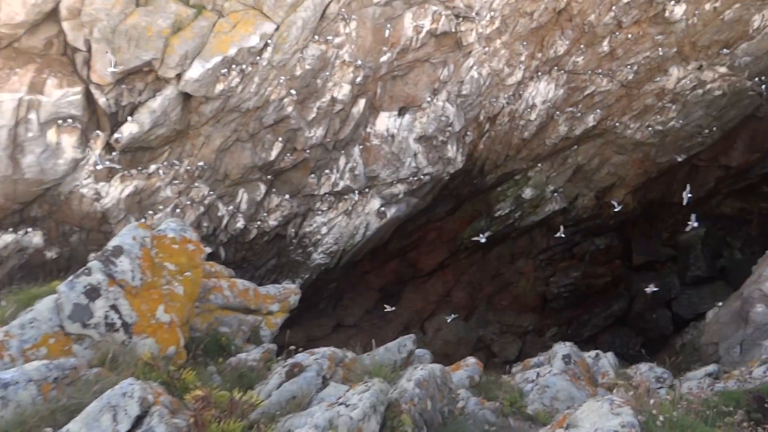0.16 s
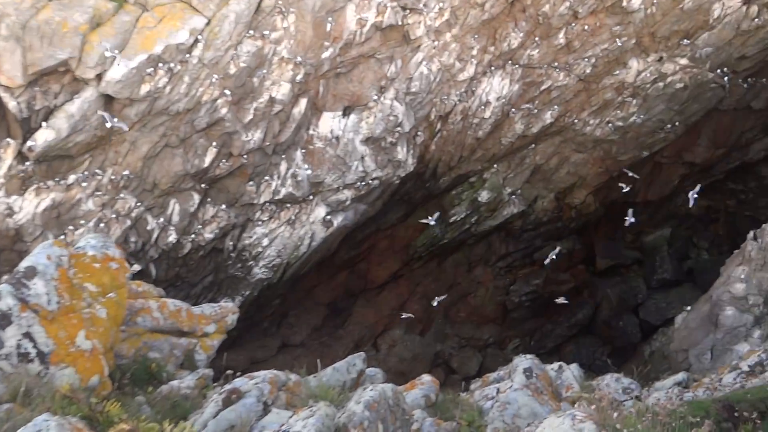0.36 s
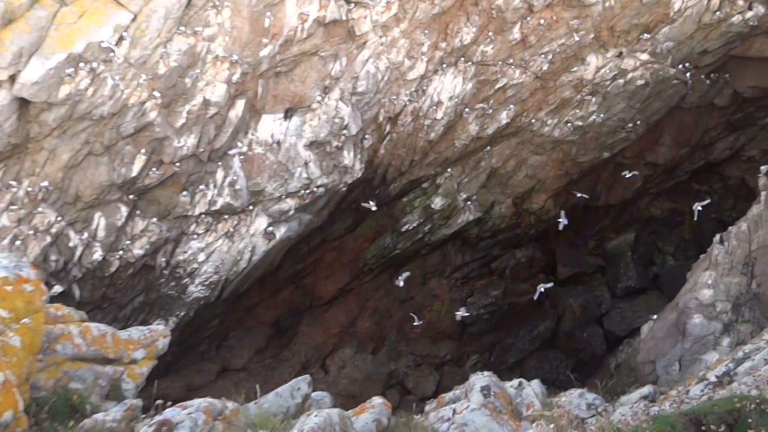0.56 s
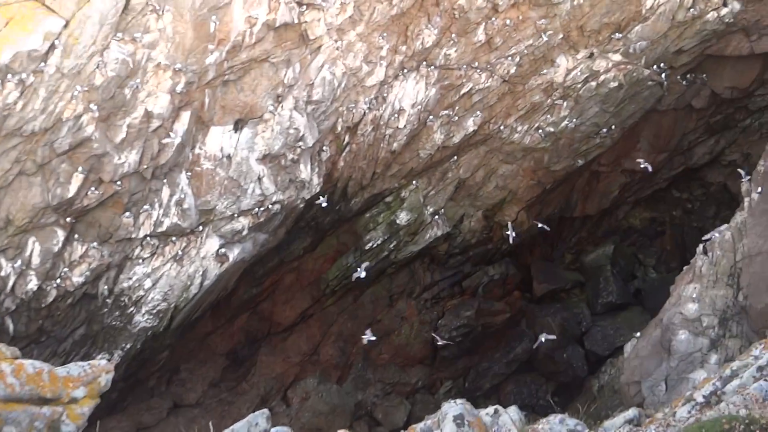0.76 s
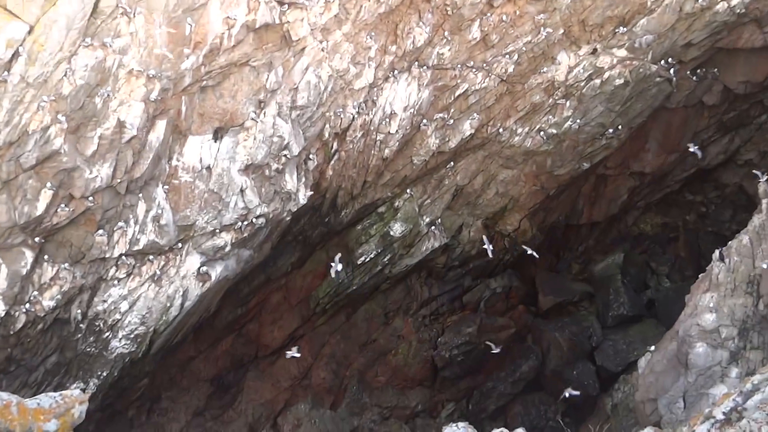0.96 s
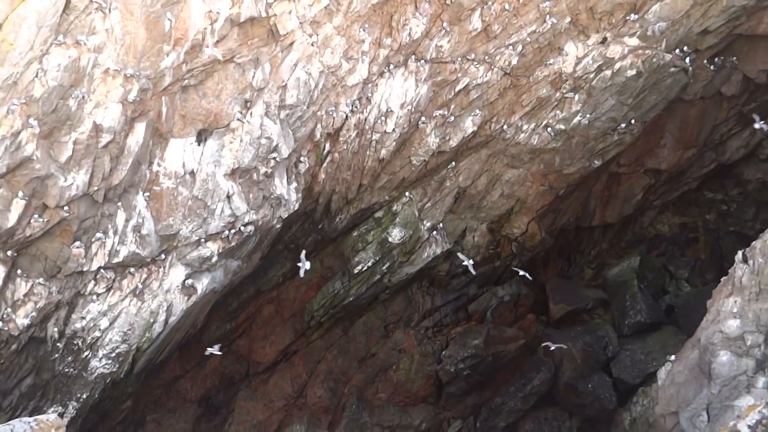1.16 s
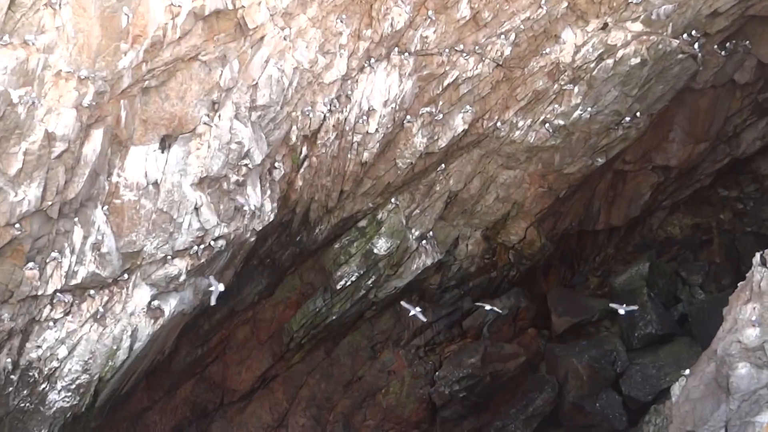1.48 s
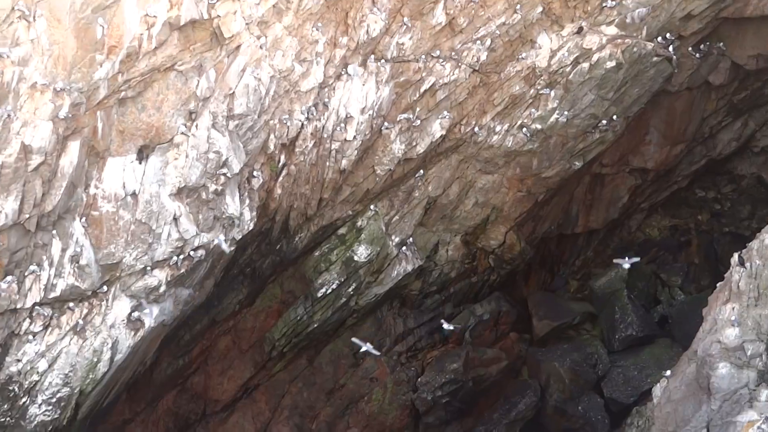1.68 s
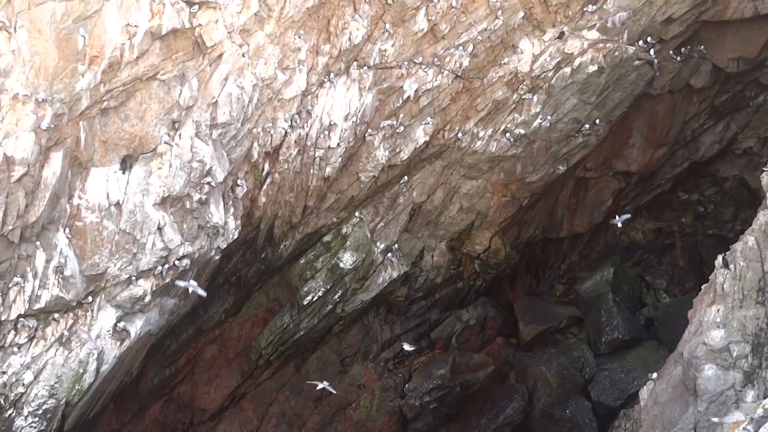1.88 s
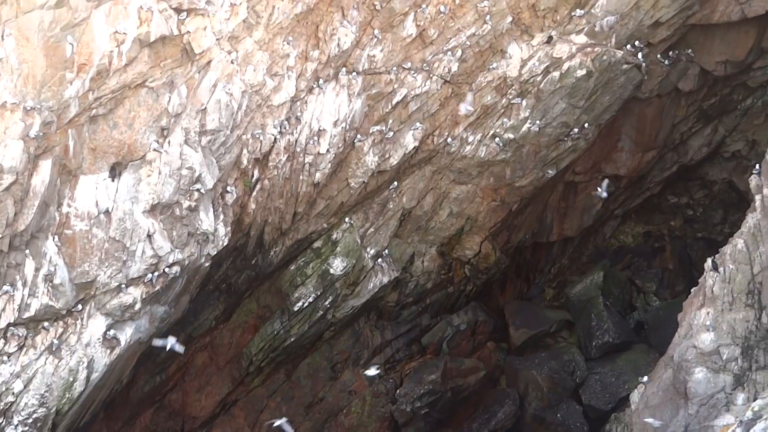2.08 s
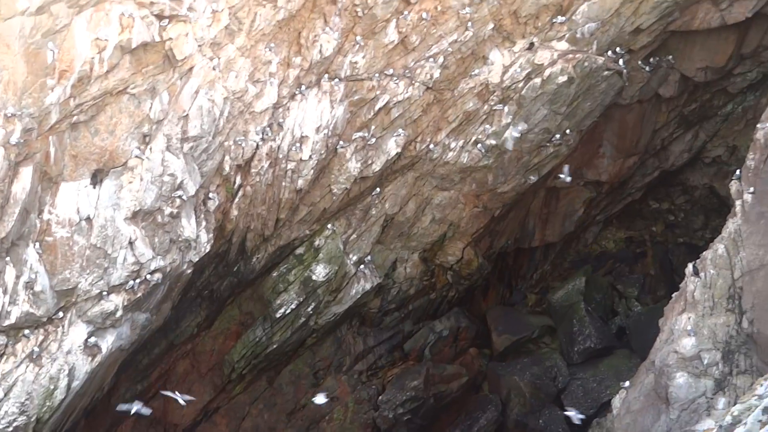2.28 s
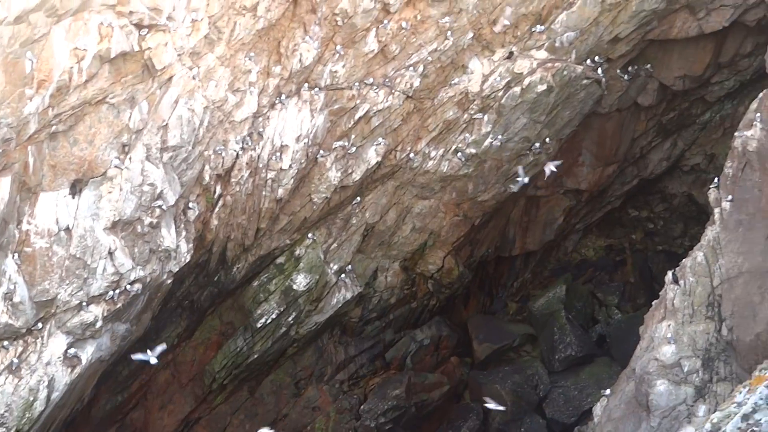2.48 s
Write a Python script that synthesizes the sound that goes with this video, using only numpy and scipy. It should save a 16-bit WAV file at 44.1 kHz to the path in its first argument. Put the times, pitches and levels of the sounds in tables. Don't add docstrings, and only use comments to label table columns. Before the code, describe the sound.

Kittiwake-like gulls clamour together, short nasal yaps first, then wails an octave higher and rattling growls; the far flock blurs into hiss, rock smears the voices, and faint surf washes steadily, heard outdoors from a distance.

```python
import sys
import numpy as np
from scipy import signal
from scipy.io import wavfile
from scipy.ndimage import uniform_filter1d

SR = 44100
rng = np.random.default_rng(int(sys.argv[2]) if len(sys.argv) > 2 else 0)


def gain_from_db(level_db):
    decades = np.asarray(level_db, float) / 20
    return 10 ** decades


def dump_mix(stems):
    frames = np.atleast_2d(stems).T
    limited = np.clip(frames, -1, 1)
    pcm = np.round(limited * 32767).astype(np.int16)
    wavfile.write(sys.argv[1], SR, pcm)


N = 115983


def evened(x):
    return x / np.sqrt(np.mean(x ** 2) + 1e-20)


def read_curve(points, hz):
    f, value = np.transpose(points)
    return np.interp(np.log(hz + 1), np.log(f + 1), value)


def add(mix, start_s, sound):
    part = mix[..., max(round(start_s * SR), 0):][..., :sound.shape[-1]]
    part += sound[..., :part.shape[-1]]


def left_right(db):
    return gain_from_db(db * np.array([[1], [-1]]))


def drift(size, span_s, seed):
    t = np.arange(size)[:, None] / SR
    rates = np.array([.4, .7, 1.1, 1.7]) / span_s
    return np.sin(2 * np.pi * (t * rates + seed)).sum(1) / np.sqrt(2)


def note(start, length, first_hz, mid_hz, last_hz, low_hz, low_db, high_hz, high_db, fill_db, seed):
    rise_s, fall_s = .013, .009
    low_width_hz, high_width_hz = 450, 600
    beak_hz, beak_db = 8000, -13.5
    t = np.arange(0, length + fall_s / 2, 1 / SR)
    size = len(t)

    u = t / length
    hz = first_hz * (1 - u) * (1 - 2 * u) + 4 * mid_hz * u * (1 - u) + last_hz * u * (2 * u - 1)
    hz = hz * (1 + .003 * drift(size, 0.0286, seed[:4]))

    k = np.arange(1, int(14000 / mid_hz) + 1)[:, None]
    f = k * hz[::32]
    gain = gain_from_db(low_db - 6 * ((f - low_hz) / low_width_hz) ** 2)
    gain = gain + gain_from_db(high_db - 6 * ((f - high_hz) / high_width_hz) ** 2)
    gain = gain + gain_from_db(high_db + beak_db - 6 * ((f - beak_hz) / high_width_hz) ** 2)
    gain = gain + gain_from_db(low_db + fill_db - 2.2 * np.maximum(f - 3000, 0) / 1000)

    phase = 2 * np.pi * np.cumsum(hz) / SR + k * seed[0]
    voice = (np.repeat(gain, 32, axis=1)[:, :size] * np.cos(k * phase)).sum(0)
    rasp = 1 + .22 * rng.standard_normal(size // 20 + 1).repeat(20)[:size]
    envelope = np.clip(np.minimum(t / rise_s, (t[-1] - t) / fall_s), 0, 1)
    shimmer = gain_from_db(2.2 * drift(size, .04, seed[4:]))
    return np.sqrt(2) * voice * rasp * envelope * shimmer


def near_birds():
    # start [t/s], length [s], pitch at start, middle, end [f/Hz]
    early_notes = [(0, .082, 510, 532, 597), (.092, .025, 590, 631, 660), (.14, .08, 602, 615, 596),
                   (.198, .093, 604, 673, 700), (.29, .026, 797, 779, 774), (.397, .065, 895, 901, 895),
                   (.4, .13, 1182, 1158, 1192), (.525, .14, 1194, 1268, 1216), (.128, .065, 565, 628, 650),
                   (.355, .045, 720, 675, 630), (.397, .07, 895, 901, 900)]
    late_notes = [(.92, .035, 545, 575, 585), (.965, .105, 1266, 1290, 1290), (1.08, .07, 549, 620, 628),
                  (1.09, .11, 547, 541, 563), (1.155, .065, 556, 592, 620), (1.205, .15, 1225, 1254, 1250),
                  (1.42, .11, 560, 553, 510), (1.71, .05, 575, 612, 668), (1.92, .05, 629, 651, 672),
                  (1.97, .06, 773, 753, 744), (2.04, .05, 988, 993, 990), (2.095, .055, 680, 686, 655),
                  (2.145, .09, 655, 640, 640), (2.315, .066, 797, 803, 772), (2.378, .052, 742, 703, 697),
                  (2.42, .085, 695, 720, 726), (2.5, .06, 1082, 1076, 1056), (2.592, .045, 575, 628, 645),
                  (.955, .03, 620, 690, 720), (1.04, .05, 700, 690, 715), (1.36, .1, 620, 650, 670),
                  (2.02, .09, 500, 505, 495), (2.06, .09, 540, 590, 600), (2.2, .11, 640, 620, 585),
                  (2.16, .1, 790, 800, 790), (2.25, .07, 820, 812, 800), (2.32, .19, 810, 708, 735)]
    wails = [(0.277, 0.048, 1867.0, 1852.0, 1865.0), (0.33, 0.06, 1795.0, 1851.0, 1943.0),
             (0.455, 0.11, 1790.0, 1778.0, 1698.0), (0.565, 0.095, 1780.0, 1786.0, 1755),
             (0.66, 0.08, 1755.0, 1737.0, 1675), (0.76, 0.14, 1749.0, 1749.0, 1735),
             (1.32, 0.08, 1752.0, 1783.0, 1760), (1.47, 0.15, 1750, 1808, 1790),
             (1.61, 0.19, 1790, 1815, 1775), (0.51, 0.055, 1778, 1755, 1700),
             (0.68, 0.058, 1750, 1727, 1675)]
    # low resonance [f/Hz], [level/dB], high resonance [f/Hz], [level/dB],
    # other harmonics relative to the low resonance [level/dB]
    early_throats = [(2240, -36, 3400, -46, -17.5), (2450, -26, 5320, -52, -20.5),
                     (1240, -40.5, 2660, -37, -13.5), (1920, -31.5, 5795, -24.5, -7),
                     (2500, -29, 6230, -30.5, -8), (1800, -23, 5600, -31, -30.5),
                     (1170, -41, 5000, -44.5, -1.5), (1300, -34.5, 2800, -35, -9),
                     (2450, -37, 5330, -45, -16.5), (1300, -37.5, 6600, -37, -7.5),
                     (4500, -34.5, 6430, -33, -39)]
    late_throats = [(2460, -43, 5500, -47, -3), (3870, -46.5, 3200, -44.5, -4.5),
                    (2450, -36.5, 5100, -42.5, -21), (2720, -41.5, 6200, -50.5, -16),
                    (1190, -42.5, 4200, -44, -14), (1250, -40, 5350, -37, -3.5),
                    (1630, -42, 4100, -40.5, -12.5), (3050, -40, 5500, -46.5, -8),
                    (2730, -34, 5900, -42, -13), (1520, -44, 4100, -43, -14), (2000, -32, 5800, -45, -11),
                    (2420, -33.5, 6700, -36.5, -7), (2700, -35, 5600, -37.5, -8),
                    (2560, -32, 5850, -39.5, -9.5), (2600, -31, 5850, -40, -15),
                    (2430, -32, 6570, -40.5, -11), (3200, -39, 4700, -41.5, -1.5),
                    (2500, -34, 5560, -34, -6.5), (2810, -40, 4900, -55, -15),
                    (2800, -41.5, 4600, -54, -10), (2800, -38, 5700, -46.5, -11.5),
                    (1470, -42.5, 3000, -44, -3.5), (1140, -40.5, 4600, -44, -7.5),
                    (1820, -39.5, 4900, -51, -7), (3180, -45, 4900, -45, -1.5),
                    (1650, -45.5, 4100, -40.5, -3.5), (740, -39, 1800, -51, -30)]
    wail_throats = [(3700, -26.5, 5560, -38, -7), (1860, -33, 5300, -42, -6), (1800, -26, 8900, -40.5, -23),
                    (1790, -36, 6500, -52.7, -14), (3400, -30, 7000, -44, -13.5),
                    (3540, -41, 7000, -48, -12), (1790, -35.5, 6900, -49, -7),
                    (1800, -44.5, 3600, -48, 1.5), (1820, -51, 3620, -46.5, 4),
                    (12200, -52, 12200, -70, -30), (12100, -50, 12000, -70, -30)]
    groups = [
        (early_notes, early_throats, 0.5),
        (late_notes, late_throats, 2),
        (wails, wail_throats, 2),
    ]
    out = np.zeros((2, N))
    for calls, throats, pan_db in groups:
        seeds = rng.random((len(calls), 8))
        for call, throat, seed in zip(calls, throats, seeds):
            add(out, call[0], note(*call, *throat, seed) * left_right(pan_db / 2))
    return out


def cliff(x, db):
    # [f/Hz], time to fall 60 dB [s]
    decay_s = [(1000, 0.62), (8000, 0.81)]
    taps = np.zeros((3, SR // 2))
    at = np.arange(400, SR // 2 - 20, 20) + rng.integers(0, 20, (3, (SR // 2 - 401) // 20))
    np.put_along_axis(taps, at, rng.choice([-1., 1.], at.shape), 1)
    hz, t, z = signal.stft(taps, SR, nperseg=256)
    fading = z * gain_from_db(-60 * t / read_curve(decay_s, hz)[:, None])
    tail = signal.istft(fading, SR, nperseg=256)[1]
    tail = tail[0] + 0.29 * tail[1:]
    echoes = signal.fftconvolve(x[None], tail / np.linalg.norm(tail[0]), axes=1)
    return gain_from_db(db) * echoes[:, :N]


def far_birds():
    out = np.zeros((2, N))
    for k, r in enumerate(rng.random((184, 16))):
        octave = 1 if r[2] < .75 else 2.8
        hz = (540 + 260 * r[1] ** 2) * octave * (.94 + .1 * r[4:7])
        db = 9 * r[3]
        low_hz, high_hz = 1100 + 2300 * r[7], 4400 + 2200 * r[0]
        sound = note(0, .04 + .14 * r[10], *hz, low_hz, db, high_hz, db - 4, -12, r[8:])
        side = gain_from_db(6 * r[9] * np.array([[1], [-.5]]))
        add(out, (k + r[0]) / 70, sound * side)
    return evened(out + cliff(out.mean(0), -3))


def hiss(colour, patchy_db, swell_db):
    # [f/Hz], likeness [0 to 1]
    likeness = [(40, 1), (200, 1), (2500, 0.84), (9000, 0.68)]
    frames, hz = N // 128 + 5, np.fft.rfftfreq(512, 1 / SR)
    a, b, c, d, patches = rng.standard_normal((frames, 257, 5)).T
    patches = evened(uniform_filter1d(uniform_filter1d(patches, 5, 0), 24, 1))
    swell = drift(frames, .3 * 128, rng.random(4))
    same = np.clip(read_curve(likeness, hz), -1, 1)[:, None]
    left = a + 1j * b
    right = same * left + np.sqrt(1 - same ** 2) * (c + 1j * d)
    tint = gain_from_db(read_curve(colour, hz)) * left_right(0.48)
    z = np.array([left, right]) * tint[..., None] * gain_from_db(patchy_db * patches + swell_db * swell)
    return evened(signal.istft(z, nperseg=512, noverlap=384)[1][:, :N])


def colony_blur():
    # [f/Hz], [level/dB per Hz]
    crowd_colour = [(290, -30), (500, 1), (2500, 0), (4050, -4), (6210, -12), (13200, -23), (15000, -79)]
    return hiss(crowd_colour, patchy_db=2.0, swell_db=-1.0)


def surf():
    # [f/Hz], [level/dB per Hz]
    wash_colour = [(20, -63), (90, -37.5), (250, -6), (600, -0.5), (2500, -6), (6000, -37.5), (15000, -36)]
    return gain_from_db(-36.5) * hiss(wash_colour, patchy_db=0.0, swell_db=3.0)


def growls():
    growl_calls = [
        (0.128, 0.16, 2470, -29.5),
        (1.047, 0.5, 2720, -38.5),
        (1.323, 0.14, 2450, -33),
        (2.046, 0.29, 2780, -36),
        (2.039, 0.23, 1300, -37.5),
        (2.498, 0.029, 3230, -35),
    ]
    pulses_per_s, jitter, width_hz = 153, .25, 550
    out, ring = np.zeros(N), np.arange(1200) / SR
    for start, length, hz, db in growl_calls:
        t = np.arange(0, length, 1 / SR)
        noise = rng.standard_normal((SR, 2))
        unsteady = evened(uniform_filter1d(noise[:, 0], 200))[:len(t)]
        turns = np.cumsum(pulses_per_s * (1 + jitter * unsteady)) / SR
        pulses = np.diff(np.floor(turns), prepend=0) * gain_from_db(2 * noise[:len(t), 1])
        decay = np.pi * width_hz * ring
        throat = decay * np.exp(-decay) * np.sin(2 * np.pi * hz * ring)
        sound = np.convolve(pulses, throat)[:len(t)]
        add(out, start, gain_from_db(db) * evened(sound) * np.sqrt(abs(np.sin(np.pi * t / length))))
    return out


def scene():
    # [t/s], [level/dB]
    excitement = [(0, -31), (.22, -30), (.42, -28.5), (.6, -32), (.88, -38), (1.15, -32.5), (1.45, -31),
                  (1.62, -30.5), (1.85, -35), (2.12, -29.5), (2.3, -28.5), (2.6, -30.5)]
    colony = gain_from_db(np.interp(np.arange(N) / SR, *np.transpose(excitement)))
    birds = gain_from_db(-.2) * near_birds() + growls() * left_right(.8)
    voices = birds + cliff(birds.mean(0), -10) + colony * gain_from_db(-1.8) * far_birds()
    voice_band = signal.butter(3, [440, 10500], "band", fs=SR, output="sos")
    voices = signal.sosfilt(voice_band, voices)
    return voices + colony * gain_from_db(-5.5) * colony_blur() + surf()


def low_pass(x):
    return signal.sosfilt(signal.butter(12, 15610, fs=SR, output="sos"), x)


def record(dry):
    mid, side = (dry[0] + dry[1]) / 2, (dry[0] - dry[1]) / 2
    side = signal.sosfiltfilt(signal.butter(4, 12500, fs=SR, output="sos"), side)
    mid = signal.sosfiltfilt(signal.butter(10, 14900, fs=SR, output="sos"), mid)
    return low_pass(np.array([mid + side, mid - side]))


dry = scene()
out = record(dry)
dump_mix(out)
```